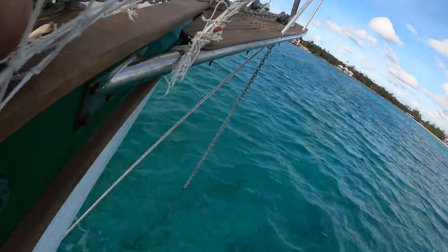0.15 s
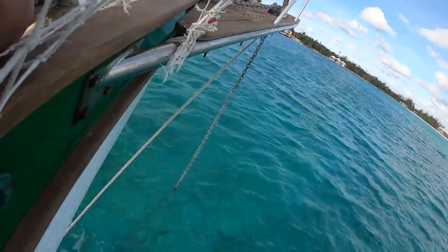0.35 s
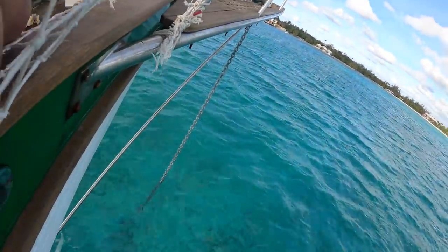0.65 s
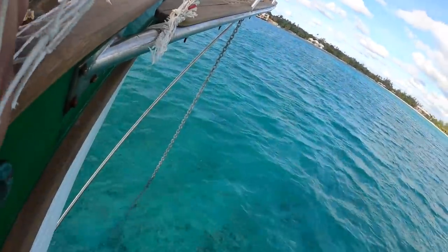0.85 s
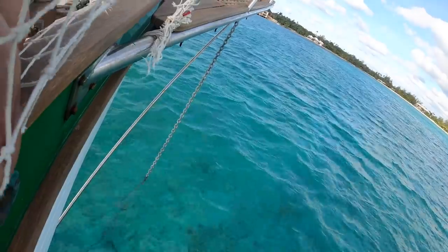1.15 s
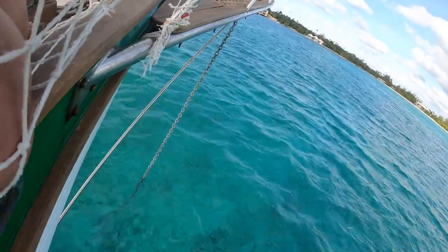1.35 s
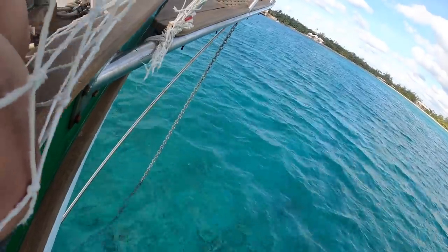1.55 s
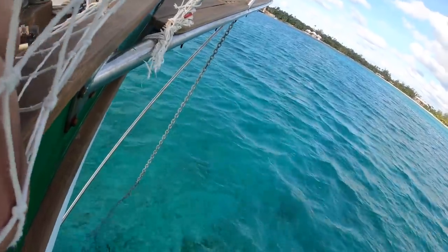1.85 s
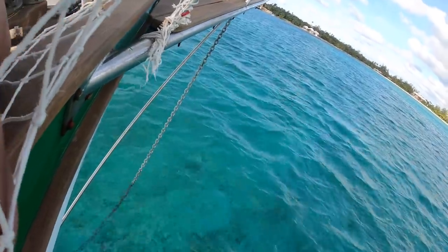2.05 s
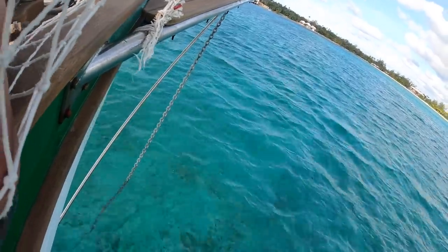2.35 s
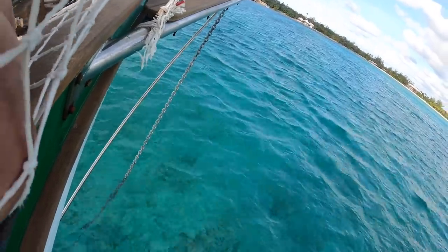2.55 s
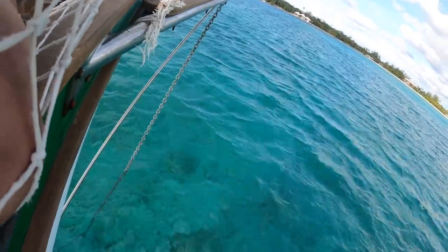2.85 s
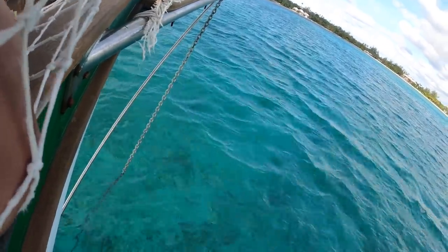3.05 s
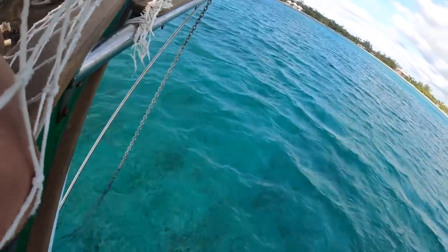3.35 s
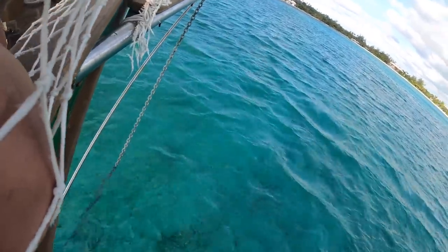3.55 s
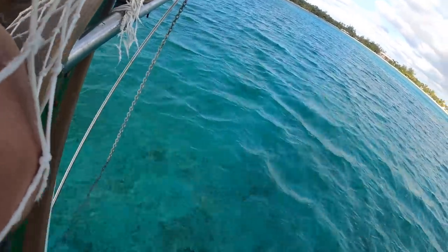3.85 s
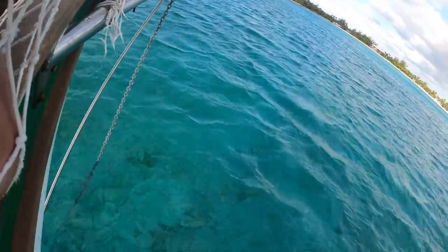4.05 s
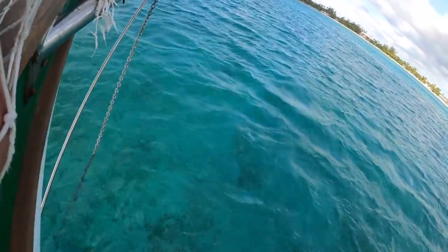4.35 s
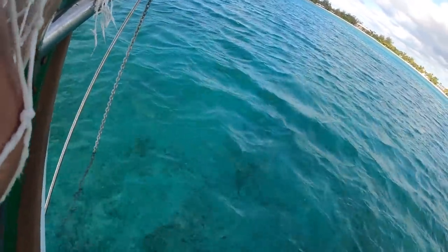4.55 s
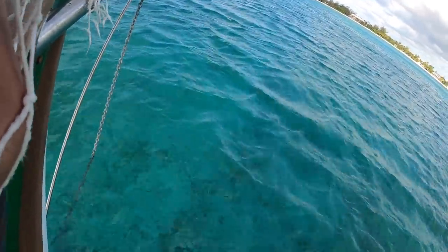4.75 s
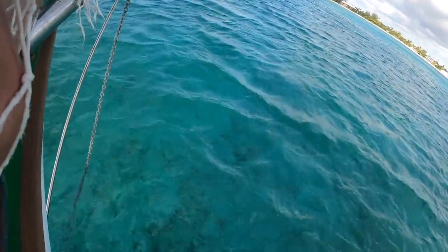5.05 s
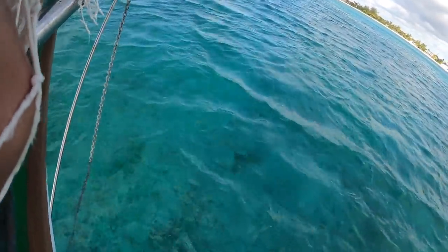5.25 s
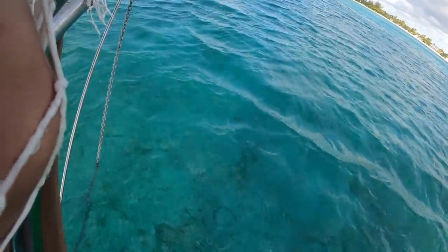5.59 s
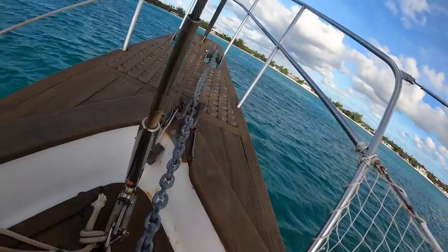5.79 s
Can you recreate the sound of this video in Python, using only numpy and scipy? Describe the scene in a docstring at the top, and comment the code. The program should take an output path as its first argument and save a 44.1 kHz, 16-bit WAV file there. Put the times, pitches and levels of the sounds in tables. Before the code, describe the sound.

On a boat in the open air, soft deep wind rumble presses on the microphone over very faint hiss. For the first 1.4 seconds there are only barely audible metal ticks and rubs. Around 1.4 to 1.7 seconds the chain slips on the windlass with short rasps, a clank and small stick-slip squeaks; another gritty jolt and knock come at 2.0. After quiet, with a tiny high squeak near 2.7, a longer scrape grinds at 2.8, then stronger jerks at 3.2 to 3.4 end in a loud ringing clank with a low boom. A brief pause follows. At 4.04 the chain runs: hard, bright, dry clanks crowd together until about 4.6, with a squeak near 4.25. It thins to lighter clinks through 5.0, gathers again from 5.2, peaks near 5.45, then ends in sparse knocks and a dull low bump around 5.87.

```python
"""An anchor chain on a boat slips in jerks over the windlass, then rattles out link by link over the bow roller.
The rasp is many tiny slips ringing short link modes; blows are fast-dying bursts of the same modes.
Stick-slip squeaks are gliding overtone stacks; the windlass drum and low booms are decaying sines.
Behind it, shaped noise gives wind rumbling on the microphone and the microphone's own hiss.
No distance or room is computed apart from a longer tail on the blows."""
import sys
import numpy as np
from scipy import signal
from scipy.fft import rfft, irfft
from scipy.io import wavfile
from scipy.ndimage import uniform_filter1d

SR = 44100
rng = np.random.default_rng(int(sys.argv[2]) if len(sys.argv) > 2 else 0)


def pcm_store(signal):
    """Save signal as 16-bit PCM."""
    levels = np.round(np.clip(np.atleast_2d(signal), -1, 1) * 32767)
    wavfile.write(sys.argv[1], SR, levels.astype(np.int16).T)


N = 261072

# Thud and fizz levels are relative to the middle part of the same sound.
# light rubs on the windlass: full drag t/s, swell t/s, hold t/s, drag level/dB, thud level/dB, fizz level/dB
RUBS = [(0.57, .15, .04, -80, 5, 8), (0.83, .05, .28, -87, 14, 10), (1.25, .13, .04, -72, -8, 8),
        (1.49, .05, .13, -59.5, -2, 1), (1.7, .02, .02, -69, 12, 4), (1.95, .1, .02, -71, 8, 3),
        (2.06, .02, .15, -68, -4, 4), (2.38, .04, .01, -71, 9, -4), (2.69, .06, .1, -75, 4, 10),
        (2.97, .03, .14, -80, 12, 10), (3.16, .08, .03, -49, 10, -14), (3.24, .03, .05, -57, 3, -6),
        (3.54, .05, .1, -86, 7, 8)]
# chain jumping under load: start t/s, length t/s, first level/dB, last level/dB, thud level/dB, fizz level/dB
JERKS = [(1.411, 0.035, -43.5, -49.5, 5, -17), (1.62, 0.071, -36.5, -38, -2.5, -13),
         (1.977, 0.051, -30.5, -38, 6, -7), (2.835, 0.092, -31.5, -33, 0.5, -5.5),
         (3.176, 0.035, -36.5, -45, 11, -2.5), (3.299, .1, -25, -31, 2.5, -7)]
# stick-slip squeaks: start t/s, length t/s, first f/Hz, last f/Hz, level/dB, slope/dB per overtone
SQUEAKS = [(1.406, 0.027, 1800, 1695, -42.5, -3.5), (1.435, 0.031, 450, 437, -35.5, -22),
           (1.611, 0.047, 2900, 2550, -34.5, -30), (1.624, 0.031, 1416, 1338, -30, -5.5),
           (1.674, 0.027, 565, 581, -32, -34), (3.114, 0.037, 895, 815, -41, -28),
           (2.699, 0.033, 6560, 6670, -36, -9), (2.72, 0.03, 6420, 6280, -43, -10),
           (2.372, 0.044, 1113, 920, -45.5, -25), (2.813, 0.05, 1430, 1310, -28.5, -5.5),
           (3.331, 0.043, 8350, 8250, -28.5, -31), (3.362, 0.024, 3930, 4110, -25.5, -34),
           (4.125, 0.019, 3170, 3100, -26, -7), (4.261, 0.063, 1068, 1083, -25, -17)]
# runs over the bow roller: start t/s, length t/s, first level/dB, last level/dB, thud level/dB, fizz level/dB
RUNS = [(4.04, .065, -46, -42, 6, -7), (4.1, .11, -50, -42, 7, -6), (4.205, .04, -50, -39, 7, -7),
        (4.24, .17, -39, -62, 3, -13), (4.41, .1, -46, -54, 2, -8), (4.512, .13, -33, -67, 7, -6),
        (4.64, .08, -71, -79, 7, -1), (4.72, .145, -56, -76, 4, -3), (4.865, .13, -68, -84, 4, -1),
        (4.997, .158, -44, -61, 5, -13), (5.153, .12, -47, -66, 7, -12), (5.275, .165, -57, -60, 3, -16),
        (5.44, .1, -62, -78, 10, -16), (5.56, .11, -66, -80, 4, -20), (5.68, .09, -60, -92, 0, -24),
        (5.83, .09, -76, -66, 4, 8)]
# links striking: t/s, nominal blow level/dB, thud level/dB, fizz level/dB, ring f/Hz
KNOCKS = [(0.1645, -54.5, 6.5, -23, 1670), (0.4065, -62.5, 19.5, 3, 1490), (0.736, -66, 12, -20, 2500),
          (0.803, -62, 14, 9, 1540), (0.819, -58, 19, 8, 1540), (1.3548, -63, 19, -15, 1790),
          (1.3776, -54, -5, 3, 4550), (1.561, -32, 6, 5.5, 3630), (1.948, -41.5, 15, -3, 1660),
          (2.0307, -26, 9.5, 9, 3880), (2.388, -42, -1, -2, 1440), (2.552, -54, 10.5, 11.5, 3650),
          (3.3968, -13.5, 0, 4.5, 1420), (4.0417, -7, -5, -1, 5350), (4.061, -29, 12, -5, 2880),
          (4.1013, -13, 3.5, 4, 2970), (4.1104, -11, -20, -4, 3500), (4.119, -18.5, -16, 7, 3110),
          (4.1424, -31, 11, -1, 1950), (4.2078, -28, 10, -20, 2800), (4.2252, -20, 1.5, -16, 3290),
          (4.2423, -26, 7, -30, 2660), (4.2595, -29, 4, -28, 3130), (4.3043, -29, 10, -26, 3200),
          (4.3198, -12, -9, -6.5, 4970), (4.365, -27, -13, -30, 2130), (4.4185, -15, -1, 3.5, 2980),
          (4.4606, -35, 14.5, -30, 2060), (4.4748, -15, -9, -12, 2040), (4.4934, -22, -20, -11, 2730),
          (4.515, -18, 6, -2, 3510), (4.5416, -20, -13, -3, 4390), (4.6299, -44, -20, 0, 4370),
          (4.6433, -38, -13, -23, 1630), (4.7277, -36, -8, -30, 3220), (4.757, -36, 6.5, -16, 3280),
          (4.783, -27, -16, -4, 5310), (4.8797, -48, 3.5, -15, 3130), (4.9437, -55, 10, -22, 3080),
          (4.9632, -44.5, -8, -29, 1740), (4.997, -23, -20, -30, 3250), (5.0547, -38, 4, -7, 2160),
          (5.1617, -34, 9.5, -30, 2860), (5.2115, -30, -15, 2, 2980), (5.2594, -46, -7, -30, 3000),
          (5.277, -36, 0.5, -28, 2130), (5.2983, -38, 5, -11, 3220), (5.3316, -35, -9, -9, 2050),
          (5.3383, -27, -13, -9, 3030), (5.3567, -24.5, -20, -25, 2540), (5.393, -23, -11, -30, 3380),
          (5.4516, -16, -5, -1, 3030), (5.4575, -21, 3, -30, 1020), (5.5354, -51, 10.5, -28, 3100),
          (5.5808, -50, 2, -27, 2900), (5.689, -28, 6, 1.5, 3530), (5.73, -51, 12, -25, 2050),
          (5.8523, -38, 8.5, -2, 1660), (5.8721, -25, -2, -24, 2100), (5.904, -37, -2, -10, 4230)]
# broad colour of the metal rubbing on the windlass: f/Hz, width/Hz, level/dB
WINDLASS_BODY = [(494.6, 164, 19.5), (817, 280, 13), (1353, 250, 9.5), (2800, 320, -2.5), (4280, 490, 4.5),
                 (5090, 400, 1.5), (5760, 170, -3), (8430, 1500, 7)]
# broad colour and modes of the bow roller: f/Hz, width/Hz, level/dB
ROLLER = [(507.6, 360, 6.6), (972, 590, 11), (2106, 680, 1.5), (3150, 600, 6), (4974, 160, 1.5),
          (6900, 170, 1.5), (8600, 1200, 3)]
# modes of the windlass drum: f/Hz, relative level/dB, time to fall 60 dB t/s
DRUM = [(1387, -9.5, 0.23), (2280, -11.5, 0.22), (3120, 1, 0.17), (3420, -15, 0.17), (3900, -8, 0.12),
        (4155, -8.5, 0.33), (5630, -2.5, 0.15), (7400, -7, 0.24), (9640, -14, 0.2), (9300, -16.5, .25),
        (9380, -9.5, 0.28), (11880, -15, .2)]
# low booms under the jolts, and a low flutter and bump at the end:
# start t/s, level/dB, f/Hz, time to fall 60 dB t/s
BOOMS = [(2.02, -41, 241, 0.17), (2.931, -41, 220, .12), (3.171, -35, 205, 0.095),
         (3.321, -29, 185.6, 0.13), (3.381, -37.5, 198.4, 0.13), (4.046, -31.5, 249, 0.16),
         (4.51, -32.5, 256.3, 0.18), (5.189, -47.5, 206, 0.13), (5.86, -35.5, 93, 0.35),
         (5.871, -27, 152, 0.19)]
# wind gusts on the microphone: t/s, deep level/dB, flutter level over the deep one/dB
GUSTS = [(0.0, -30.5, -7), (0.58, -33.5, -15.5), (0.71, -27, -24), (1.05, -30.5, -17), (3.06, -31, -10),
         (3.44, -28, -19.5), (3.89, -29, -21.5), (4.18, -29, -27), (5.82, -33.5, -21.5)]
# roar of the wind: t/s, level before its lumps/dB
ROAR = [(0, -58), (.55, -60), (1.05, -55), (3.06, -58), (3.5, -62), (4.2, -57), (5.9, -57)]
# relative spectrum of the wind: f/Hz, level/dB per Hz
WIND = [(6, 5), (16, 10), (38, -7), (60, -13), (125, -17), (200, -31), (530, -43), (2000, -63.5),
        (5000, -77)]
# relative spectrum of the microphone noise: f/Hz, level/dB per Hz
HISS = [(1500, -14), (4000, -9), (7400, -15), (7900, 0.5), (11000, -7), (16000, -7.5)]

# f/Hz where thud, middle and fizz begin: light rubs, hard jerks, links on the roller
LIGHT_HZ, HARD_HZ, LINK_HZ = (310, 3140, 7000), (375, 1630, 5360), (345, 1610, 4850)
RELEASE_S = 4  # from here the chain runs free of the windlass
SWELL_DB, LET_GO_DB_PER_S = 22, 300  # a rub swells by this much, then dies at this rate
KNOCK_T60_S, T60_S_PER_DB = 0.026, 0.0004  # base decay of a 0 dB blow; softer blows last longer
DRUM_DB, HISS_DB = -18, -75.5
EDGE_HZ = 15900  # upper band limit


def amp(db):
    """Amplitude for a level in dB."""
    return 10 ** (np.asarray(db) / 20)


def evened(x):
    """Scales x to rms 1."""
    return x / np.sqrt(np.mean(x ** 2) + 1e-20)


def read(points, hz):
    """Interpolates a table of (f/Hz, value) along log frequency."""
    f, value = np.transpose(points)
    return np.interp(np.log(hz + 1), np.log(f + 1), value)


def add(mix, s, sound):
    """Lays a sound into the mix from s seconds on."""
    part = mix[round(s * SR):][:len(sound)]
    part += sound[:len(part)]


def bands(x, gain_db, splits, steep=6):
    """Colours x and splits it into low, middle and high parts, each of rms 1, beginning at the splits."""
    hz = np.fft.rfftfreq(len(x), 1 / SR) + 1
    above = [1 / (1 + (split / hz) ** steep) for split in splits] + [0]
    spectrum = rfft(x) * amp(gain_db(hz))
    parts = []
    for k in range(3):
        share = above[k] * (1 - above[k + 1])
        parts.append(evened(irfft(spectrum * share, len(x))))
    return np.array(parts)


def body(peaks, knee_hz, slope_db):
    """Gain of broad resonances over a treble that falls above a knee."""
    def gain_db(hz):
        fall = slope_db * np.log2(1 + (hz / knee_hz) ** 2)
        return fall + sum(db / (1 + (2 * (hz - f) / width) ** 2) for f, width, db in peaks)
    return gain_db


def grit(per_s, spread_db, t60, rasp, count=70):
    """Tiny slips of uneven size, each ringing one short mode of a link, over a fine rasp."""
    t = np.arange(round(t60 * SR)) / SR
    out = np.zeros(N)
    mode_hz = np.linspace(18, 125, count) ** 2 * rng.uniform(0.96, 1.03, count)
    for hz in mode_hz:
        size = amp(spread_db * np.minimum(rng.exponential(1, N), 4))
        slips = size * (rng.random(N) < per_s / SR)
        mode = amp(-60 * t / t60) * np.sin(2 * np.pi * hz * t) * hz ** 0.15
        out += signal.oaconvolve(slips, mode)[:N]
    return evened(out) + rasp * rng.standard_normal(N)


def rubs(parts):
    """Each rub swells, holds and dies away under the three parts of the rasp."""
    t = np.arange(N) / SR
    out = np.zeros(N)
    for s, swell, hold, db, thud_db, fizz_db in RUBS:
        rise_db = SWELL_DB * np.maximum(s - t, 0) / max(swell, 0.005)
        fall_db = LET_GO_DB_PER_S * np.maximum(t - s - hold, 0)
        out += amp(db - rise_db - fall_db) * (amp([thud_db, 0, fizz_db]) @ parts)
    return out


def jerks(parts):
    """The rasp sets in quickly, lasts while the chain slides, and dies away when it grips."""
    t = np.arange(SR // 4) / SR
    out = np.zeros(N)
    for s, length, first_db, last_db, thud_db, fizz_db in JERKS:
        slide_db = np.interp(t, [0, length], [first_db, last_db])
        fade_db = np.maximum(t - length, 0) * np.array([[600], [900], [900]])  # the thud dies slowest
        balance_db = np.array([[thud_db], [0], [fizz_db]])
        shape = amp(slide_db - fade_db + balance_db) * (1 - np.exp(-t / 0.0089))
        # uneven, lumpy loudness within each jerk
        shape *= amp(2.0 * evened(uniform_filter1d(rng.standard_normal(len(t)), 400)))
        add(out, s, (shape * parts[:, round(s * SR):][:, :len(t)]).sum(0))
    return out


def squeak(length, first_hz, last_hz, db, slope_db):
    """Regular stick-slip: a short gliding stack of overtones, unsteady in pitch and level."""
    hz = np.linspace(first_hz, last_hz, round(length * SR))
    hz = hz * (1 + 0.02 * uniform_filter1d(rng.standard_normal(len(hz)), 120))
    turn = 2 * np.pi * np.cumsum(hz) / SR
    stack = np.zeros(len(hz))
    for k in range(8):
        if (k + 1) * first_hz < EDGE_HZ:
            overtone_db = slope_db * k - 9.9 * rng.random() * (k > 0)
            stack += amp(overtone_db) * np.sin((k + 1) * turn)
    flicker = amp(1.5 * evened(uniform_filter1d(rng.standard_normal(len(hz)), 150)))
    return amp(db) * stack * signal.windows.tukey(len(hz), 0.6) * flicker


def runs(parts):
    """Each run slides from its first to its last level under the three parts of the rasp."""
    out = np.zeros(N)
    for s, length, first_db, last_db, thud_db, fizz_db in RUNS:
        rasp = amp([thud_db, 0, fizz_db]) @ parts[:, round(s * SR):][:, :round(length * SR)]
        level = amp(np.linspace(first_db, last_db, len(rasp)))
        edges = signal.windows.tukey(len(rasp), 200 / len(rasp))  # 100 samples at each end
        add(out, s, rasp * level * edges)
    return out


def clinks(per_s, spread_db):
    """Small links touching at random chop the running rasp into short bursts."""
    size = amp(spread_db * np.minimum(rng.exponential(1, N), 3))
    touches = size * (rng.random(N) < per_s / SR)
    burst = np.exp(-np.arange(2000) / (0.0053 * SR))
    return evened(0.5 + signal.oaconvolve(touches, burst)[:N])


def knocks(parts):
    """Each blow is a burst of link modes that dies fast, the treble first, one mode standing out."""
    t = np.arange(SR // 4) / SR
    out = np.zeros(N)
    rise = 1 - np.exp(-t / np.array([[0.002], [0.001], [0.0008]]))  # thud, middle, fizz
    for s, db, thud_db, fizz_db, hz in KNOCKS:
        i = round(s * SR)
        n = min(len(t), N - i)
        base_s = max(KNOCK_T60_S - T60_S_PER_DB * db, 0.005)
        life = base_s * np.array([[1.4], [1.01], [0.7]])
        tail = amp(-23.5 - 60 * t / (4 * life))  # hull and deck prolong it
        shape = rise * (amp(-60 * t / life) + tail)
        crack = (amp([[thud_db], [0], [fizz_db]]) * shape)[:, :n] * parts[:, i:i + n]
        ring = amp(2.5 - 60 * t / (0.48 * life[1])) * rise[1] * np.sin(2 * np.pi * hz * t)
        roller = clank(thud_db, fizz_db, t) * (s > RELEASE_S)
        out[i:i + n] += amp(db) * (0.42 * crack.sum(0) + ring[:n] + roller[:n])
    return out


def clank(thud_db, fizz_db, t):
    """A blow rings the roller's modes, each as strongly as the place of the blow allows."""
    hz, width, db = np.transpose(ROLLER)[:, :, None]
    spot_db, detune = rng.standard_normal((2, len(hz), 1))  # random place of the blow
    tilt_db = read([(1000, thud_db), (2500, 0.0054), (6500, fizz_db)], hz)
    # wider modes die faster
    modes = amp(db + tilt_db + 4.7 * spot_db - 18) * np.exp(-0.35 * np.pi * width * t)
    swing = np.sin(2 * np.pi * hz * (1 + 0.049 * detune) * t)
    return (modes * swing).sum(0) * (1 - np.exp(-t / 0.00056))


def strikes():
    """The sharp push that each blow on the windlass gives its drum."""
    force = np.zeros(N)
    for s, db, *_ in KNOCKS:
        force[round(s * SR)] = amp(db + 21.5) * (s < RELEASE_S)
    return force


def drum(force):
    """The windlass drum's decaying modes, driven by the chain's force, ring on after every slip."""
    t = np.arange(SR // 2) / SR
    tail = sum(amp(db - 60 * t / t60) * np.sin(2 * np.pi * hz * t) for hz, db, t60 in DRUM)
    return amp(DRUM_DB) * signal.oaconvolve(force, tail / np.linalg.norm(tail))[:N]


def boom(db, hz, t60):
    """A soft low swing that dies away, with a close neighbour mode."""
    t = np.arange(SR // 3) / SR
    neighbour = 1.2 * np.sin(2 * np.pi * 1.27 * hz * t + 6 * rng.random())
    swing = np.sin(2 * np.pi * hz * t) + neighbour
    return amp(db - 60 * t / t60) * (1 - np.exp(-t / 0.0055)) * swing


def wind():
    """Low noise on the microphone in three parts: deep and flutter follow the gusts, a lumpy roar its own course."""
    t = np.arange(N) / SR
    s, deep_db, flutter_db = np.transpose(GUSTS)
    deep = np.interp(t, s, deep_db)
    flutter = np.interp(t, s, deep_db + flutter_db)
    roar = np.interp(t, *np.transpose(ROAR))
    parts = bands(rng.standard_normal(N), lambda hz: read(WIND, hz), (4, 50, 170), steep=2.75)
    lumps = evened(uniform_filter1d(uniform_filter1d(rng.standard_normal(N), 1500), 1500))
    parts[2] *= amp(2.7 * lumps)
    return (amp([deep, flutter, roar]) * parts).sum(0)


def hiss():
    """Steady microphone noise: white noise shaped to a fixed spectrum."""
    spectrum = rfft(rng.standard_normal(N)) * amp(read(HISS, np.fft.rfftfreq(N, 1 / SR)))
    return amp(HISS_DB) * evened(irfft(spectrum, N))


def scene():
    """The chain on windlass and roller, the drum answering, low booms, wind and hiss behind."""
    rasp = grit(per_s=60, spread_db=2.5, t60=0.041, rasp=0.53)
    windlass_gain = body(WINDLASS_BODY, knee_hz=8800, slope_db=-9)
    light = bands(rasp, windlass_gain, LIGHT_HZ)
    hard = bands(rasp, windlass_gain, HARD_HZ)
    roller_rasp = grit(per_s=50, spread_db=1.0, t60=0.022, rasp=0.7)
    on_roller = bands(roller_rasp, body(ROLLER, knee_hz=8300, slope_db=-12.5), LINK_HZ)
    rubbing = rubs(light)
    jumps = jerks(hard)
    blows = knocks(on_roller)
    on_windlass = np.arange(N) < RELEASE_S * SR
    force = 2.4 * rubbing + 0.16 * jumps + 0.36 * blows * on_windlass + strikes()
    running = runs(on_roller) * clinks(per_s=76, spread_db=1.8)
    mix = rubbing + jumps + drum(force) + running + blows
    for s, *settings in SQUEAKS:
        add(mix, s, squeak(*settings))
    for s, *settings in BOOMS:
        add(mix, s, boom(*settings))
    return (mix + wind() + hiss())[None]


def record(dry):
    """The band limit: a steep low-pass."""
    low_pass = signal.firwin(511, EDGE_HZ, window=("kaiser", 9), fs=SR)
    return signal.oaconvolve(dry, low_pass[None], "same")


dry = scene()
out = record(dry)
pcm_store(out)
```